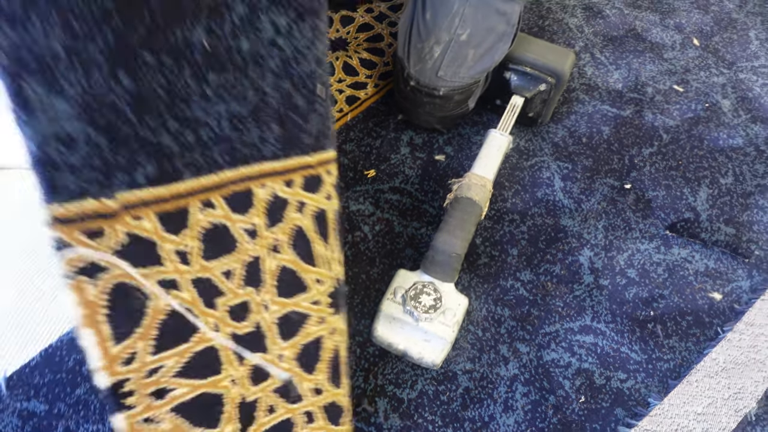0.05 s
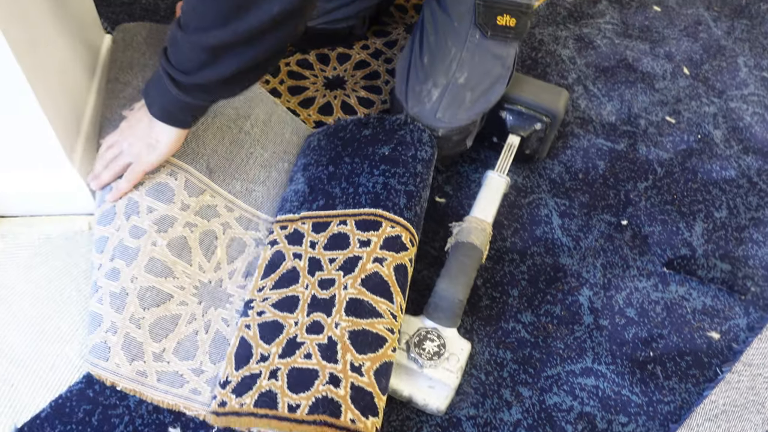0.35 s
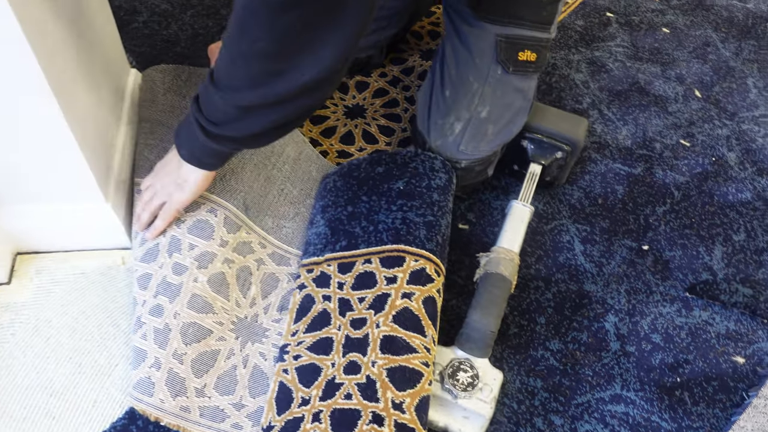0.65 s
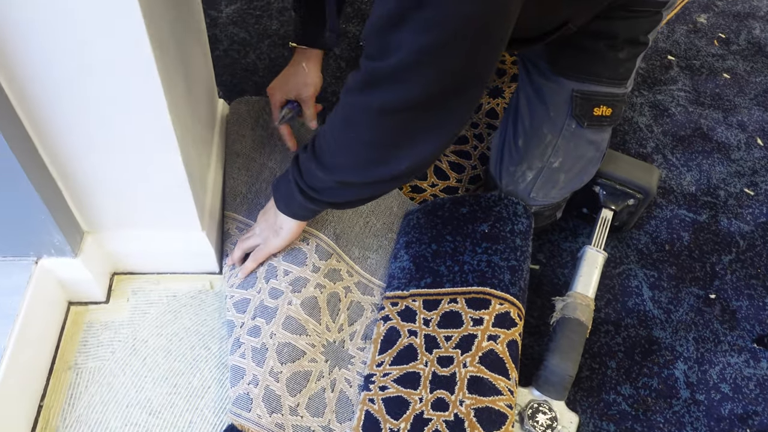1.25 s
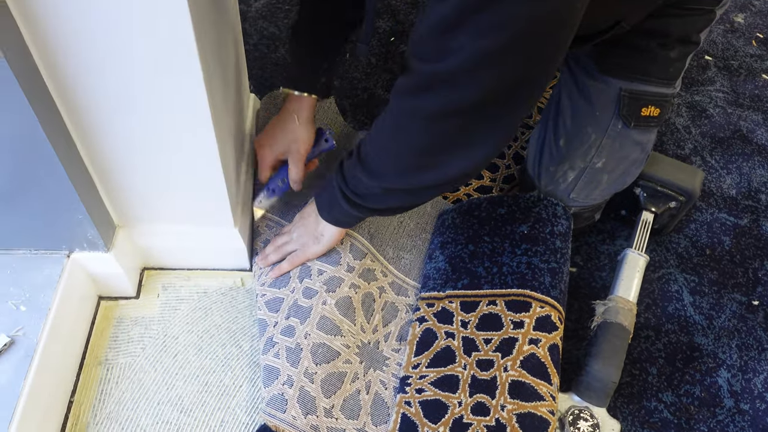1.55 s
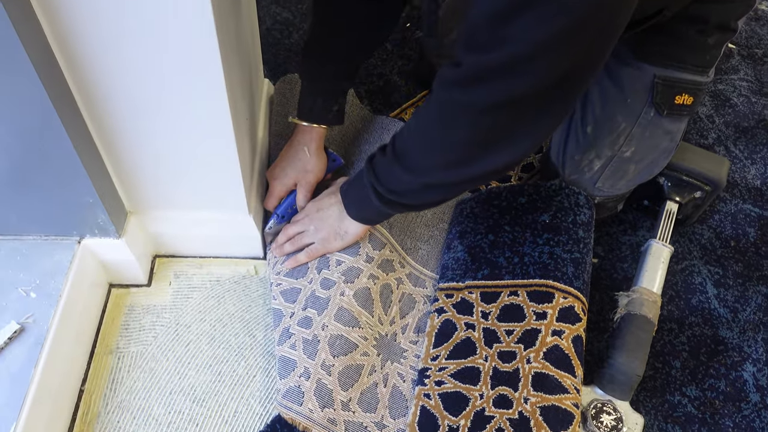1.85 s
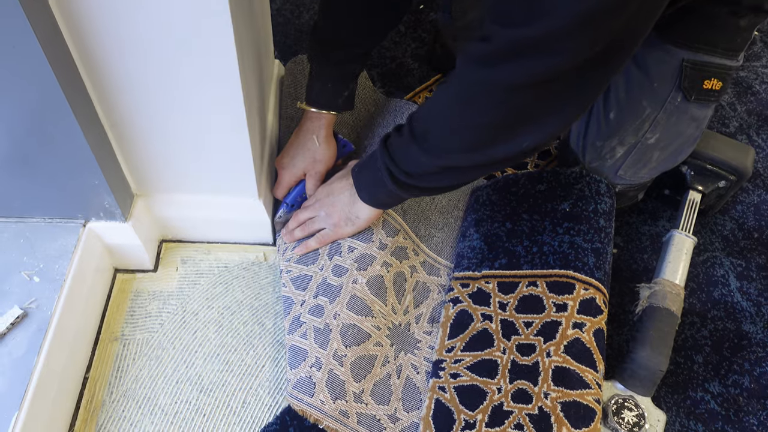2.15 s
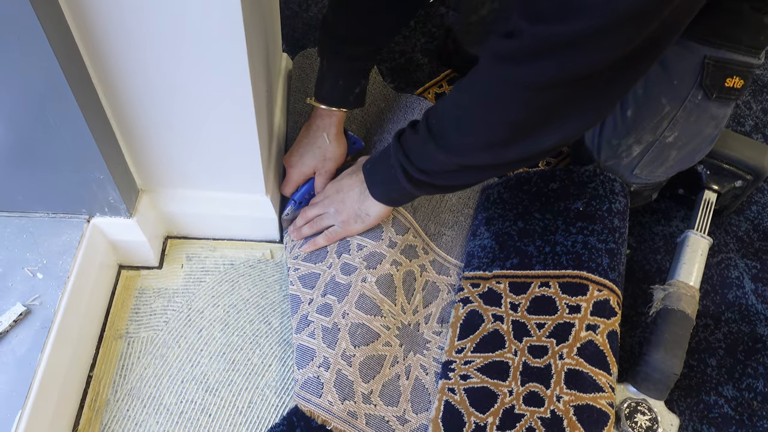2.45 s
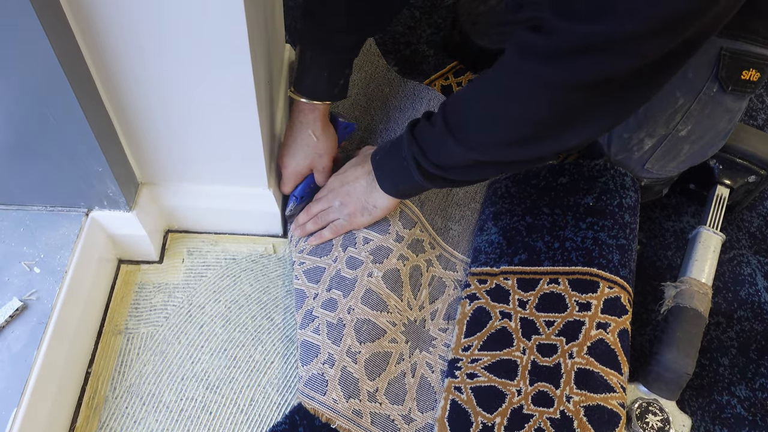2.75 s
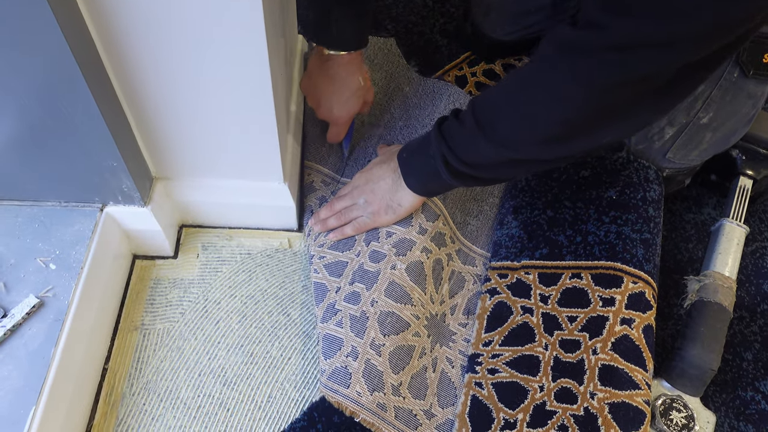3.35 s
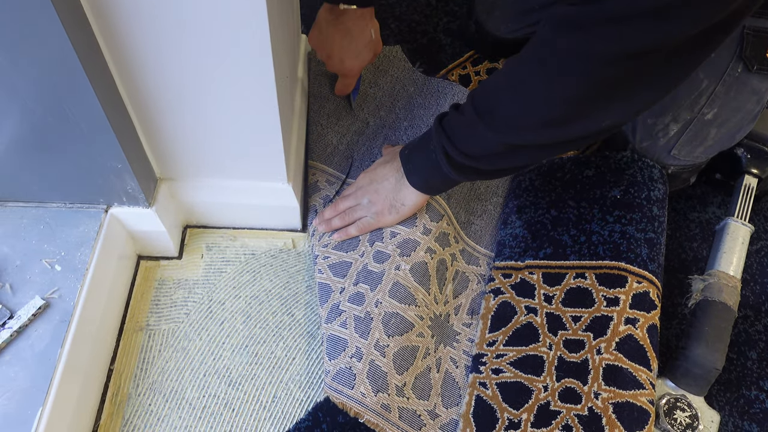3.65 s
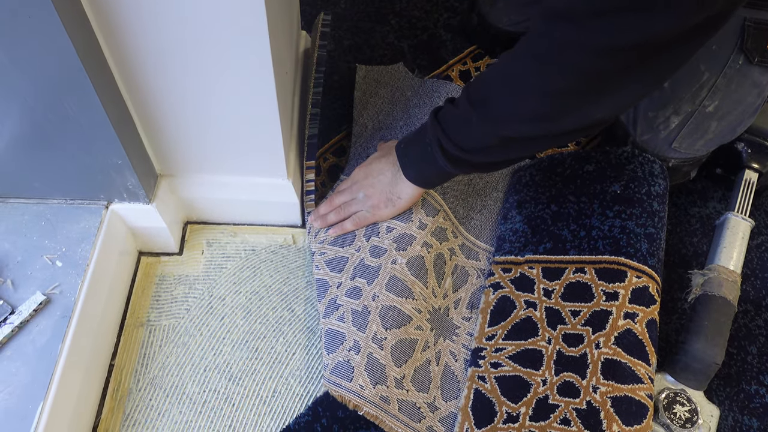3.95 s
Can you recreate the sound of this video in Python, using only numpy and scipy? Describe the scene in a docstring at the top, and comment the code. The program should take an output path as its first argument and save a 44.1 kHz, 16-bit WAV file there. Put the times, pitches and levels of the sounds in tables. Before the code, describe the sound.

A utility knife rips through carpet backing in one long pull, close by in a small, quiet room. Beforehand, the carpet is patted down, the blade clicks out and a few yarns pop. Afterwards the blade rattles back in.

```python
"""A carpet fitter pats a folded carpet down by a door frame, close by in a small, quiet, carpeted room.
At 1.5 s the blade of a utility knife slides out, clicking and ringing in its guide.
From 2 s the tip is set to the backing and pops through a few yarns.
From 3.15 s one long pull rips the weave, the taut strip ringing hollow and rising near the edge.
At 3.86 s the blade rattles back into its handle."""
import sys
import numpy as np
from scipy import signal
from scipy.io import wavfile
from scipy.ndimage import uniform_filter1d

SR = 44100
rng = np.random.default_rng(int(sys.argv[2]) if len(sys.argv) > 2 else 0)


def store_pcm(level_fs):
    """Save levels as 16-bit WAV."""
    pcm = np.round(np.clip(level_fs, -1, 1) * 32767).astype(np.int16)
    wavfile.write(sys.argv[1], SR, np.atleast_2d(pcm).T)


N = 176400
TIME_S = np.arange(N) / SR


def amp(db):
    """Decibels to gain."""
    return 10 ** (np.asarray(db) / 20)


def unit(x):
    """Scales to rms 1."""
    return x / np.sqrt(np.mean(x ** 2) + 1e-20)


def read(points, hz):
    """Reads a table on a log-frequency axis."""
    f, value = np.transpose(points)
    return np.interp(np.log(hz + 1), np.log(f + 1), value)


def level(table, column=1):
    """Gain over time from one dB column; silent outside the table."""
    rows = np.array(table)
    return amp(np.interp(TIME_S, rows[:, 0], rows[:, column], left=-200, right=-200))


def add(mix, start_s, sound):
    """Adds a sound at its time."""
    part = mix[max(round(start_s * SR), 0):][:len(sound)]
    part += sound[:len(part)]


def convolve(x, response):
    """Applies an impulse response scaled to energy 1."""
    return signal.oaconvolve(x, response / np.linalg.norm(response))[:N]


def colour(x, spectrum, size=4096):
    """Causal filter of energy 1 with the given spectral shape."""
    log_gain = np.log(amp(read(spectrum, abs(np.fft.fftfreq(size, 1 / SR)))))
    response = np.fft.ifft(np.exp(np.conj(signal.hilbert(log_gain)))).real
    return convolve(x, response[:size // 2])


def lowpass(x, hz):
    """Rolls off the treble."""
    return signal.sosfilt(signal.butter(4, hz, fs=SR, output="sos"), x)


def highpass(x, hz, order):
    """Rolls off the bass."""
    return signal.sosfilt(signal.butter(order, hz, "high", fs=SR, output="sos"), x)


def resonate(x, hz, width_hz):
    """Two resonators in series that follow a pitch curve."""
    turn = np.exp(2j * np.pi * np.cumsum(hz) / SR)
    pole = np.exp(-np.pi * width_hz / SR)
    for _ in range(2):
        x = 2 * (turn * signal.lfilter([1 - pole], [1, -pole], x / turn)).real
    return x


def sing(x, modes):
    """Parallel resonances, each at its own level."""
    return sum(amp(db) * unit(resonate(x, np.full(N, hz), width_hz)) for hz, width_hz, db in modes)


def steady(x, span_s):
    """Evens out the level over a span and keeps the finer grain."""
    window = signal.windows.hann(int(span_s * SR) + 3)
    power = signal.oaconvolve(x ** 2, window / window.sum(), "same")
    return x / np.sqrt(abs(power) + 1e-6)


def patchy(x, depth_db=2.8, size=256):
    """Shifts the colour at random, as when the contact changes."""
    bands = signal.stft(x, nperseg=size)[2]
    field = uniform_filter1d(rng.standard_normal(bands.shape), size=4, axis=0)
    field = unit(uniform_filter1d(field, size=9, axis=1))
    return unit(signal.istft(bands * amp(depth_db * field), nperseg=size)[1][:N])


def grains(per_s, spread_db):
    """Random clicks of uneven size."""
    size = amp(spread_db * np.minimum(rng.exponential(1, N), 4))
    return unit(size * rng.choice([-1., 1.], N) * (rng.random(N) < per_s / SR))


def burst(decay_s, size=4096):
    """A dying cluster of tiny cracks."""
    return steady(rng.standard_normal(size), 0.00022) * np.exp(-np.arange(size) / SR / decay_s)


# The pull. Each row: time in seconds, then backing, yarn and hiss levels in dB.
PULL_LEVELS = [(3.147, -50, -47.5, -50), (3.168, -32, -28.5, -32), (3.18, -34, -37.5, -37.5),
               (3.21, -20, -22, -31.5), (3.243, -24, -23, -32), (3.27, -17.5, -28.5, -34),
               (3.37, -23, -31.5, -36), (3.42, -26, -32.5, -37.5), (3.55, -22.5, -30.5, -33),
               (3.607, -34.5, -38, -40), (3.668, -25, -26.5, -29.5), (3.73, -23.5, -24.5, -31),
               (3.755, -28, -26.5, -30.5), (3.80, -26, -21, -30), (3.834, -26, -18, -25.5),
               (3.847, -24, -31.5, -32.5), (3.87, -40, -39, -47)]
# Flapping backing, cracking yarn, hiss on the blade. Each row: frequency in Hz, relative gain in dB.
BACKING_SPECTRUM = [(50, -46), (90, -11.5), (160, -5.5), (215, 1.5), (290, 0.5), (380, -1.5), (520, -5.5),
                    (700, -16.5), (1500, -48)]
YARN_SPECTRUM = [(250, -41), (550, -6.5), (850, -1), (1250, -4), (1650, -1.5), (2300, -7), (3700, -5.5),
                 (6000, -15.5), (12000, -45.5)]
HISS_SPECTRUM = [(2500, -5), (5000, -1.5), (7000, 2.5), (10000, -1.5), (16000, -6)]
# Blade chatter in the cut. Each row: frequency in Hz, width in Hz, relative level in dB.
CHATTER_MODES = [(1650, 380, -8), (3600, 550, -9)]
# Hollow ring of the taut strip; peak in the blade's hiss. Each row: time in seconds, level in dB,
# frequency in Hz.
STRIP_GLIDE = [(3.677, -34.5, 537), (3.775, -19, 560), (3.812, -16, 610), (3.834, -12, 790),
               (3.847, -33, 790)]
HISS_GLIDE = [(3.2, -37.5, 6700), (3.38, -46, 6230), (3.55, -56, 7900), (3.68, -46.5, 9300),
              (3.83, -51, 9300)]


def rip(yarns_per_s=330, fibres_per_s=4000, spray_s=0.0021):
    """The blade meets yarns at uneven gaps; each kicks the backing and sheds breaking fibres."""
    pace = np.exp(.6 * unit(uniform_filter1d(rng.standard_normal(N), size=100)))
    yarns_cut = np.floor(np.cumsum(yarns_per_s * pace / pace.mean()) / SR)
    strength = amp(3.0 * np.clip(rng.standard_normal(N), -2, 2))
    kicks = unit(np.diff(yarns_cut, prepend=0) * strength)
    kick_energy = signal.lfilter([1], [1, -np.exp(-1 / (SR * spray_s))], kicks ** 2)
    spray = np.sqrt(unit(kick_energy) + 0.58)
    fibres = unit(spray * grains(fibres_per_s, spread_db=3.0))
    backing = steady(colour(kicks + 0.8 * fibres, BACKING_SPECTRUM), 0.16)
    yarn = steady(colour(0.74 * kicks + fibres, YARN_SPECTRUM) + sing(fibres, CHATTER_MODES), 0.04)
    friction = 0.83 * fibres + unit(spray * rng.standard_normal(N))
    hiss = steady(colour(friction, HISS_SPECTRUM), 0.081)
    strip = glide(unit(spray * rng.standard_normal(N)), STRIP_GLIDE, width_hz=360, span_s=0.036)
    hiss_peak = glide(fibres, HISS_GLIDE, width_hz=800, span_s=0.055)
    return (backing * level(PULL_LEVELS, 1) + patchy(yarn) * level(PULL_LEVELS, 2)
            + patchy(hiss) * level(PULL_LEVELS, 3) + strip + hiss_peak)


def glide(drive, path, width_hz, span_s):
    """A resonance whose pitch and level move along the cut."""
    times_s, _, hz = np.transpose(path)
    ring = resonate(drive, np.interp(TIME_S, times_s, hz), width_hz)
    return steady(ring, span_s) * level(path)


# Yarns under the tip. Each row: start in seconds, level in dB, decay in seconds, body offset in dB.
YARN_SNAPS = [(2.026, -47, 0.02, -10), (2.159, -47, 0.0091, -17), (2.257, -44, 0.018, -23),
              (2.445, -50.5, 0.02, 1), (2.9000, -18.5, 0.0022, -5.5), (2.9399, -20.5, 0.0042, -3),
              (2.955, -25, 0.0059, 1), (2.9759, -20, 0.0023, 7), (2.9778, -14, 0.002, 0.5),
              (3.009, -25.5, 0.0042, 8.5), (3.0817, -27, 0.0018, -31), (3.092, -28, 0.0017, -31),
              (3.108, -29.5, 0.0015, -6), (3.207, -28, 0.0018, 8.5)]
# Crack and body of a snap. Each row: frequency in Hz, relative gain in dB.
CRACK_SPECTRUM = [(300, -49), (1500, -16), (3800, 2), (7500, -1), (11000, -9.5), (16000, -13)]
BODY_SPECTRUM = [(60, -22), (180, 4), (350, -2.5), (800, 4), (1250, -9), (1800, 4), (2600, -9.5),
                 (4200, -17), (8000, -63)]


def snaps():
    """Single yarns part with a bright crack and jolt the backing."""
    crack, body = np.zeros((2, N))
    for start_s, db, decay_s, body_db in YARN_SNAPS:
        add(crack, start_s, amp(db) * burst(decay_s))
        add(body, start_s, amp(db + body_db) * burst(decay_s))
    return colour(crack, CRACK_SPECTRUM) + colour(body, BODY_SPECTRUM)


# Blows on carpet and floor. Each row: start in seconds, level in dB, pitch in Hz, decay in seconds,
# scuff offset in dB, scuff cutoff in Hz.
BLOWS = [(0.157, -32.5, 161.5, 0.0049, -3.5, 8000), (0.737, -34, 143, 0.0076, -11, 1800),
         (1.019, -41.5, 407, 0.0084, 10, 12000), (1.027, -35, 212, 0.016, -27, 1200),
         (0.2454, -11.5, 346, 0.0033, -13, 3360), (0.2985, -11, 288, 0.0028, -3, 1200),
         (.35, -8, 450, 0.0018, -6.5, 4400), (1.091, -43.5, 690, 0.00076, 5.5, 2000),
         (1.22, -29.5, 514, 0.0039, -4.5, 1840), (1.249, -24.5, 188, 0.0048, -15, 3000),
         (1.263, -29.5, 208, 0.023, -27, 1200), (1.4008, -24, 250, 0.012, -10, 9500),
         (1.811, -28.5, 602, 0.0048, 0, 1850), (1.816, -29, 194, 0.0028, -5, 1210),
         (2.750, -39, 307, 0.0054, -4, 3000)]
# Contact scuff. Each row: frequency in Hz, relative gain in dB.
SCUFF_SPECTRUM = [(60, -38), (250, -1), (750, 4.5), (1100, -3.5), (2200, -9), (3600, -20), (8000, -18),
                  (16000, -24)]


def thumps(rise_s=0.0026, pitch_sag=0.086, crumple_s=0.004):
    """Each blow bounces a damped fold of carpet, with a slap and a short scuff on top."""
    body, scuff = np.zeros((2, N))
    t = TIME_S[:SR // 5]
    for start_s, db, hz, decay_s, scuff_db, cutoff_hz in BLOWS:
        fade = np.exp(-t / decay_s)
        envelope = (1 - np.exp(-(t / rise_s) ** 2)) * fade
        phase = 2 * np.pi * np.cumsum(hz * (1 + pitch_sag * (2 * fade - 1))) / SR
        uneven = unit(uniform_filter1d(rng.standard_normal(len(t)), int(crumple_s * SR) + 1))
        crumple = 0.45 * lowpass(uneven * (1 - fade), hz=200)
        bounce = np.gradient(envelope * (np.cos(phase) + crumple * np.sin(phase)))
        add(body, start_s, amp(db) * bounce / abs(bounce).max())
        contact = 0.87 * burst(decay_s=0.0048)
        contact[0] += 3.5  # slap
        add(scuff, start_s, amp(db + scuff_db) * lowpass(contact, cutoff_hz))
    return highpass(body + colour(scuff, SCUFF_SPECTRUM), hz=36, order=2)


# Blade sliding in its guide. Each row: start in seconds, length in seconds, level in dB.
BLADE_SLIDES = [(1.538, .025, -51), (1.591, .054, -29.5), (3.858, .03, -27), (3.887, .025, -38),
                (3.915, .022, -33), (3.934, .045, -40)]
# Slider catches. Each row: start in seconds, level in dB, decay in seconds, knock offset in dB,
# cutoff in Hz.
SLIDER_CATCHES = [(.773, -26, 0.0029, -20, 8200), (1.5902, -17, 0.0052, -22, 11100),
                  (1.597, -13, 0.0033, -33, 15400), (1.6017, -14.5, 0.0027, -36, 9600),
                  (1.632, -13, 0.0013, -27, 13100), (1.6697, -17.5, 0.0021, 3, 14900),
                  (1.672, -31, 0.01, 11.5, 8300), (3.8665, -10.5, 0.0023, -6, 15000)]
# Knock of the handle. Each row: frequency in Hz, relative gain in dB.
HANDLE_SPECTRUM = [(100, -30), (400, -13), (700, 2), (1200, -1), (3000, 0.5), (7500, -4), (10000, 4),
                   (13000, 2), (16000, -18)]


def knife(attack_s=0.00033, release_s=0.0027, case_hz=2680, case_t60_s=0.03):
    """Friction and catches ring the metal; catches knock the handle, and the first clinks the case."""
    drive, knock, case = np.zeros((3, N))
    for start_s, length_s, db in BLADE_SLIDES:
        attack = np.clip((TIME_S - start_s) / attack_s, 0, 1)
        release = np.clip((start_s + length_s - TIME_S) / release_s, 0, 1)
        drive += amp(db) * attack * release
    drive *= steady(grains(per_s=3000, spread_db=1.5), 0.017)
    for start_s, db, decay_s, knock_db, cutoff_hz in SLIDER_CATCHES:
        add(drive, start_s, amp(db) * lowpass(burst(decay_s), cutoff_hz))
        add(knock, start_s, amp(db + knock_db) * lowpass(burst(decay_s), cutoff_hz))
    t = TIME_S[:SR // 5]
    clink = amp(-32 - 60 * t / case_t60_s) * np.sin(2 * np.pi * case_hz * t)
    add(case, SLIDER_CATCHES[0][0], clink)
    return colour(knock, HANDLE_SPECTRUM) + case + metal_ring(drive)


# Knife modes. Each row: frequency in Hz, width in Hz, relative dB sliding out, relative dB sliding back.
KNIFE_MODES = [(2900, 250, -7, -14), (3660, 70, 3, -5), (4900, 300, -6, -11), (6420, 230, 6, -12),
               (6930, 240, -7, 1), (8900, 600, -5, -6), (10350, 240, 0, 1), (12200, 350, -1, -1),
               (14600, 330, 6, 0)]
# Free blade. Each row: frequency in Hz, level in dB, T60 in seconds.
BLADE_MODES = [(6500, -23, .35), (9110, -26, .3)]


def metal_ring(drive, retract_from_s=3.0):
    """The knife's modes balance differently going out and back; the free blade rings on."""
    hz, width_hz, out_db, back_db = np.transpose(KNIFE_MODES)[:, :, None]
    t = TIME_S[:SR // 10]
    modes = width_hz * np.exp(-np.pi * width_hz * t) * np.cos(2 * np.pi * hz * t)
    metal = convolve(drive * (TIME_S < retract_from_s), (amp(out_db) * modes).sum(0))
    metal += convolve(drive * (TIME_S >= retract_from_s), (amp(back_db) * modes).sum(0))
    t = TIME_S[:SR // 2]
    for blade_hz, db, t60_s in BLADE_MODES:
        ring = amp(-60 * t / t60_s) * np.sin(2 * np.pi * blade_hz * t)
        metal += amp(db) * convolve(drive, ring)
    return highpass(metal, hz=3050, order=3)


# Carpet and sleeves moving. Each row: time in seconds, rub level in dB before trim, bristle level in dB.
SHIFT_LEVELS = [(0, -43, -57.5), (.19, -34, -60.5), (.235, -24.5, -43.5), (.28, -29.5, -53.5),
                (.32, -26.5, -45.5), (.39, -32.5, -50.5), (.68, -52.5, -68), (.75, -40.5, -62),
                (.99, -56, -86), (1.07, -51, -52), (1.16, -49.5, -75), (1.21, -39.5, -56.5),
                (1.33, -47, -83), (1.52, -46, -69)]
SET_LEVELS = [(1.523, -50, -52.5), (1.6, -62, -64), (1.78, -43.5, -49), (1.92, -54.5, -70.5),
              (2.2, -48, -50), (2.27, -64, -51.5), (2.46, -56, -56), (2.55, -66, -61.5), (2.73, -50, -51.5),
              (2.88, -55.5, -57), (2.935, -44, -45.5), (2.984, -30, -25), (3.03, -36, -62),
              (3.14, -53, -47)]
LIFT_LEVELS = [(3.839, -34, -38), (4, -39, -45)]
# Soft rub and its bristly top. Each row: frequency in Hz, relative gain in dB.
RUB_SPECTRUM = [(40, -34), (100, -3.5), (200, 6), (300, 4.5), (450, -4.5), (1100, -16), (2500, -36)]
BRISTLE_SPECTRUM = [(400, 6), (1200, 4.5), (3500, 0.5), (7000, -6), (16000, -19.5)]
# Brushed backing. Each row: frequency in Hz, width in Hz, level in dB re the bristles.
BRUSH_MODES = [(1600, 170, -9), (2180, 220, -3), (3480, 260, -7)]


def handling(rub_trim_db=-5.5):
    """Pile and cloth rub softly, bristles flick, and the brushed backing resonates."""
    rub = amp(rub_trim_db) * steady(colour(grains(per_s=2500, spread_db=4), RUB_SPECTRUM), 0.16)
    flicks = grains(per_s=2000, spread_db=3.5) + 0.42 * rng.standard_normal(N)
    bristle = patchy(steady(colour(flicks, BRISTLE_SPECTRUM), 0.54))
    moves = sum(rub * level(move, 1) + bristle * level(move, 2)
                for move in (SHIFT_LEVELS, SET_LEVELS, LIFT_LEVELS))
    brush = sing(grains(per_s=4000, spread_db=-0.5), BRUSH_MODES)
    return moves + brush * level(SHIFT_LEVELS, 2)


# Weight on the floor. Each row: time in seconds, level in dB.
LEAN_LEVELS = [(2.14, -51), (2.19, -44), (2.24, -53), (2.55, -57)]
# Floorboards. Each row: frequency in Hz, relative gain in dB.
BOARD_SPECTRUM = [(25, -43), (85, 12), (500, -65)]


def floor_rumble():
    """The floor rumbles as the fitter leans on it."""
    return steady(colour(rng.standard_normal(N), BOARD_SPECTRUM), 0.16) * level(LEAN_LEVELS)


# Room decay. Each row: frequency in Hz, T60 in seconds.
ROOM_DECAY = [(120, 0.073), (400, 0.39), (1200, 0.24), (8000, 0.22), (16000, 0.03)]


def room(x, size=26460, wall_delay_s=0.004, rise_s=0.0024):
    """A diffuse tail that starts after the first near wall and dies band by band."""
    taps = rng.standard_normal(size) * np.clip((TIME_S[:size] - wall_delay_s) / rise_s, 0, 1)
    hz, t, bands = signal.stft(taps, SR, nperseg=256)
    fade = amp(-60 * t / read(ROOM_DECAY, hz)[:, None])
    return convolve(x, signal.istft(bands * fade, SR, nperseg=256)[1])


# Room tone. Each row: frequency in Hz, relative gain in dB.
AIR_SPECTRUM = [(20, -29), (90, -1.5), (240, -5), (490, -18.5), (1300, -10), (3500, -15.5), (16000, -26.5)]


def room_tone(db=-56.5):
    """Faint, steady noise of the room's air."""
    return amp(db) * colour(rng.standard_normal(N), AIR_SPECTRUM)


def scene(side_db=-9):
    """All sources sit in the middle; only the room adds a little width."""
    blows, cracks, cut, metal = thumps(), snaps(), rip(), knife()
    moves = handling() + floor_rumble()
    send = (amp(-17.5) * blows + amp(-15.5) * cracks + amp(-21.5) * cut
            + amp(-15.0) * metal + amp(-10.0) * moves)
    air = room_tone()
    mid = blows + cracks + cut + metal + moves + room(send) + air
    side = amp(side_db) * room(send + 1.05 * air)
    return np.array([mid + side, mid - side])


def record(dry, low_cut_hz=65, band_limit_hz=16000):
    """The microphone's bass roll-off and the recorder's band limit."""
    band_limit = signal.firwin(511, band_limit_hz, window=("kaiser", 9), fs=SR)
    return signal.oaconvolve(highpass(dry, low_cut_hz, order=1), band_limit[None], "same")


dry = scene()
out = record(dry)
store_pcm(out)
```